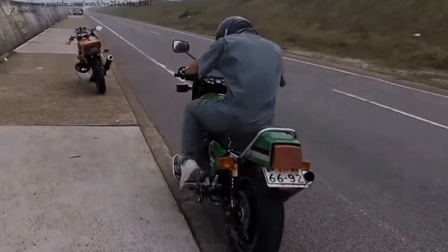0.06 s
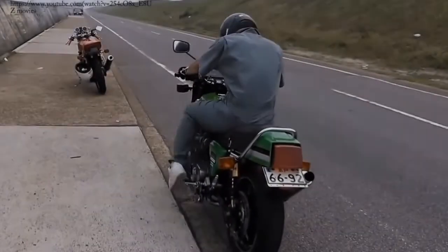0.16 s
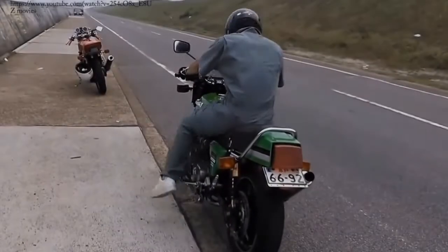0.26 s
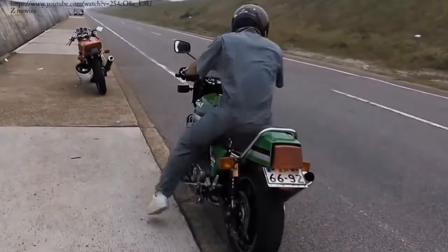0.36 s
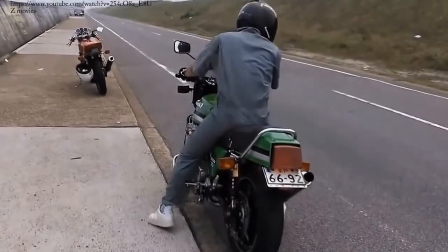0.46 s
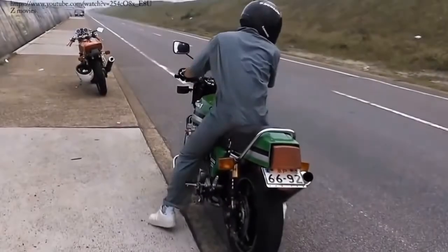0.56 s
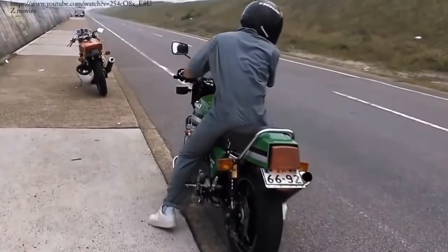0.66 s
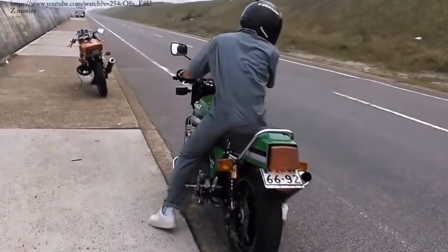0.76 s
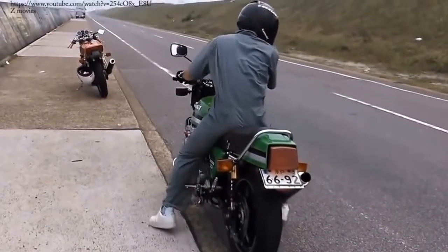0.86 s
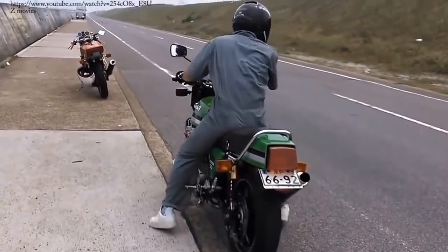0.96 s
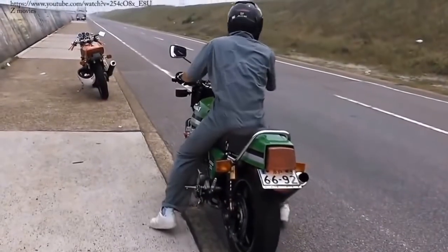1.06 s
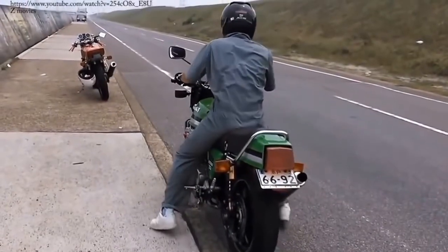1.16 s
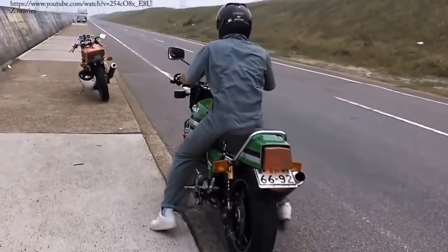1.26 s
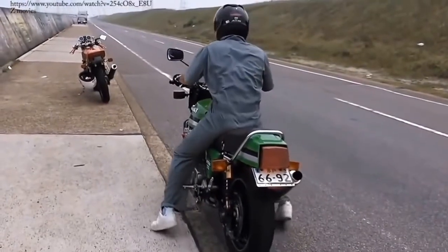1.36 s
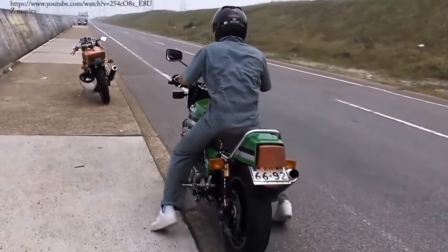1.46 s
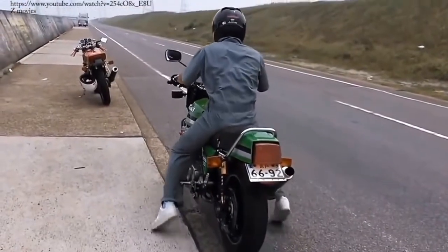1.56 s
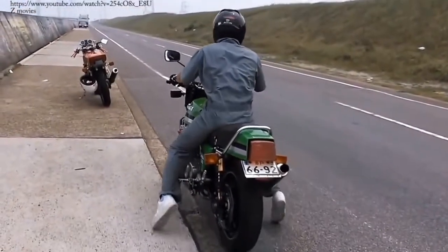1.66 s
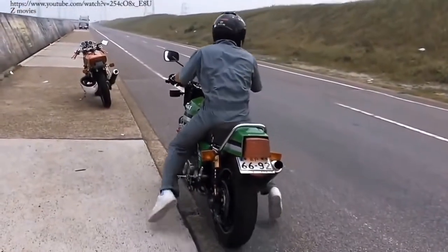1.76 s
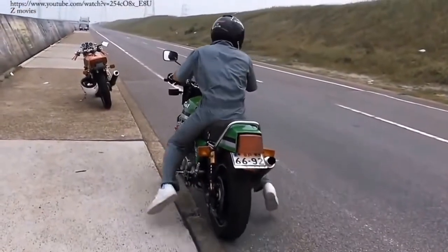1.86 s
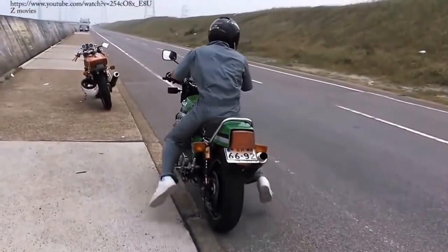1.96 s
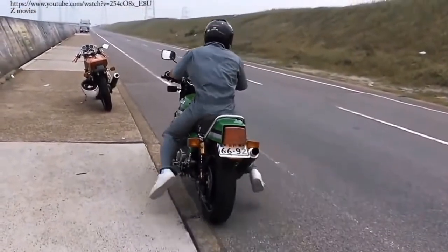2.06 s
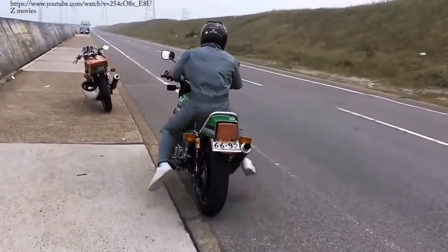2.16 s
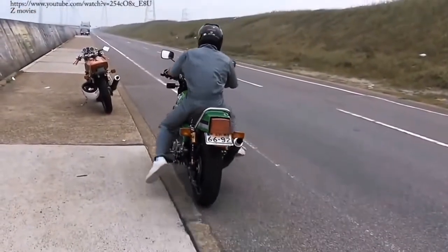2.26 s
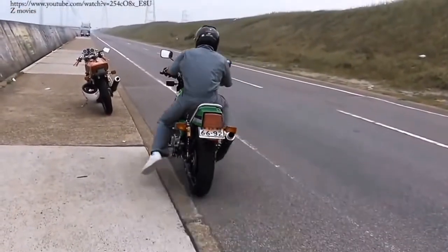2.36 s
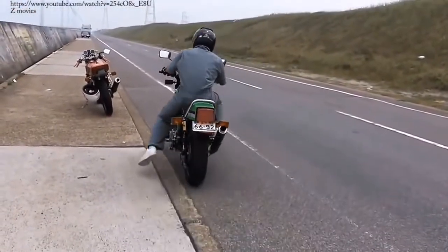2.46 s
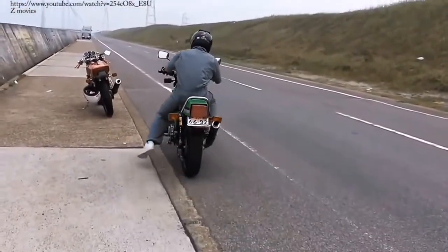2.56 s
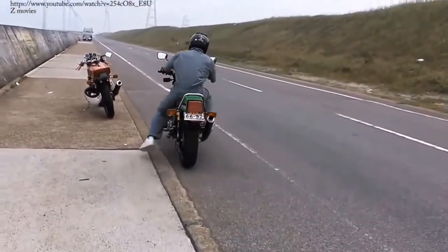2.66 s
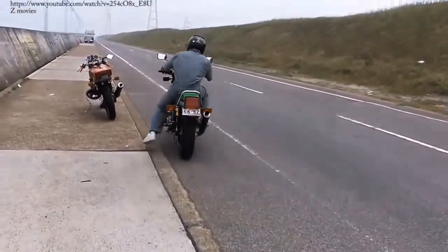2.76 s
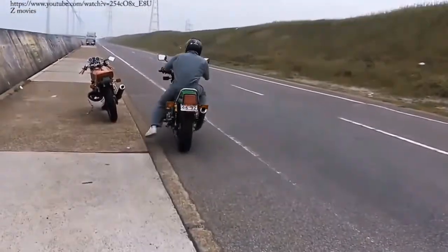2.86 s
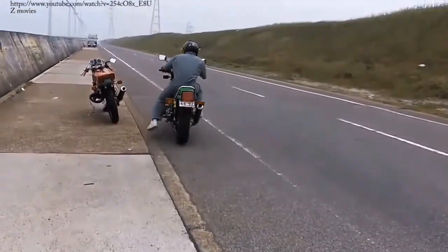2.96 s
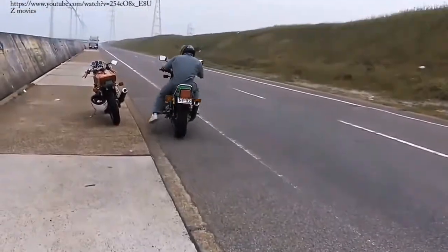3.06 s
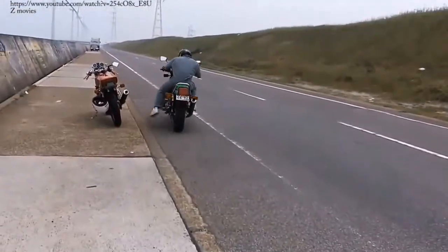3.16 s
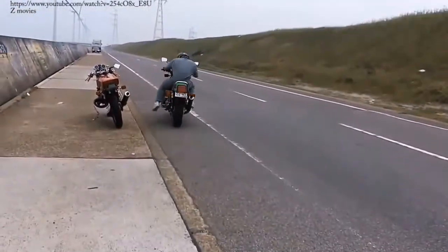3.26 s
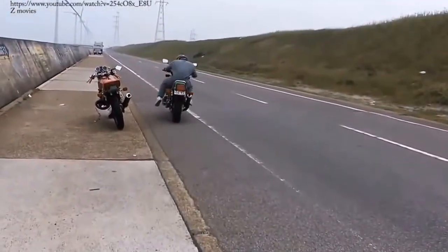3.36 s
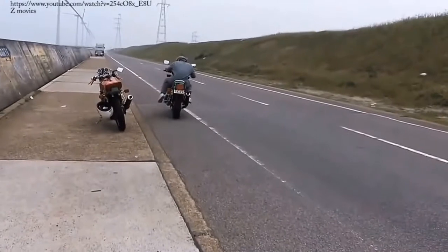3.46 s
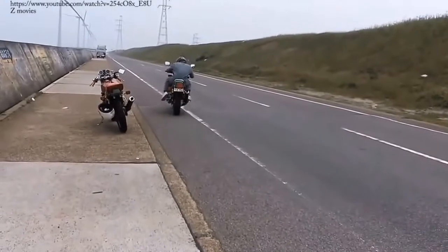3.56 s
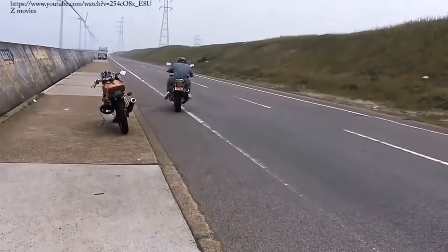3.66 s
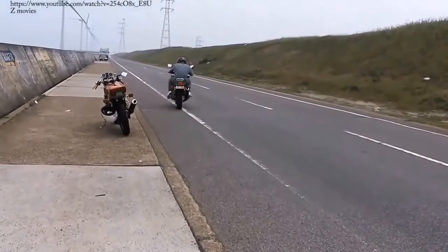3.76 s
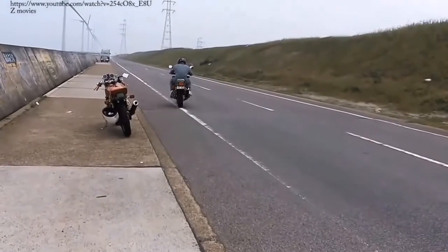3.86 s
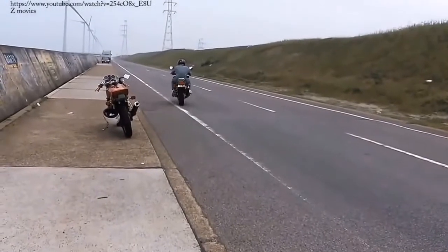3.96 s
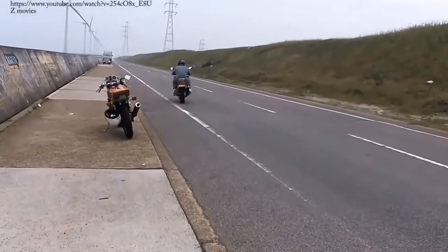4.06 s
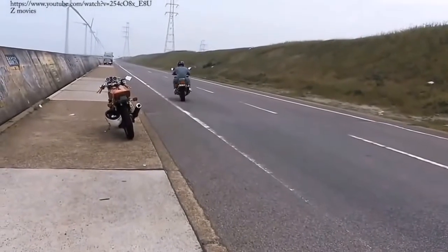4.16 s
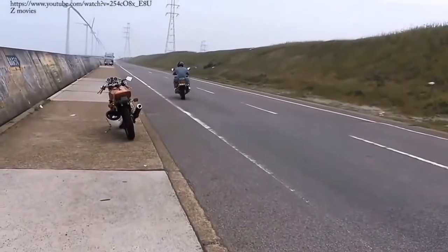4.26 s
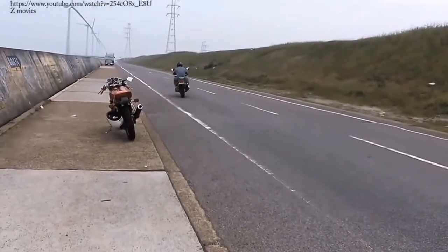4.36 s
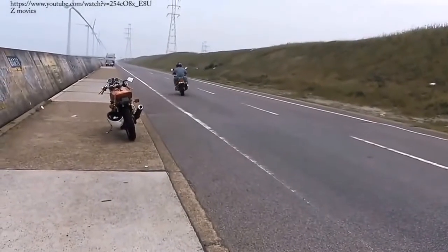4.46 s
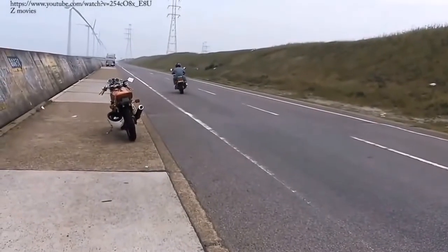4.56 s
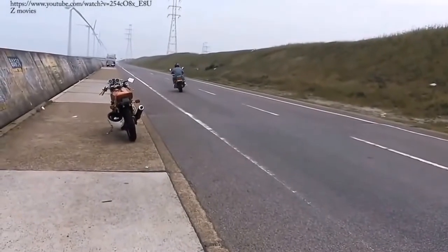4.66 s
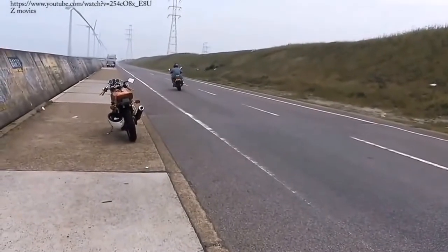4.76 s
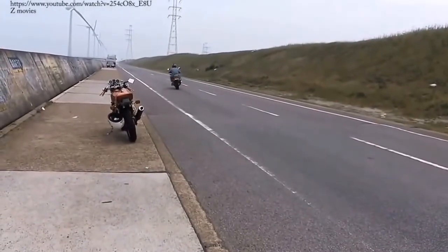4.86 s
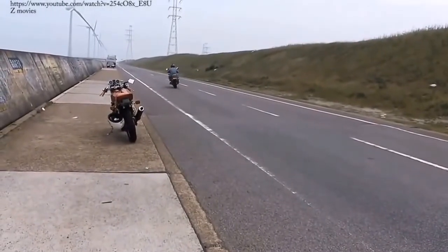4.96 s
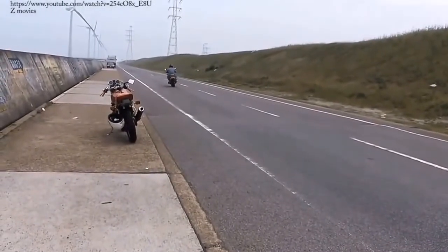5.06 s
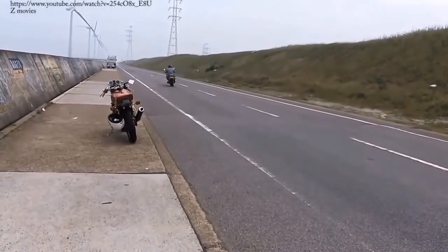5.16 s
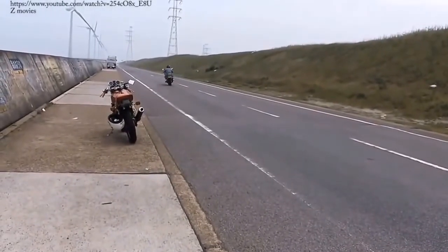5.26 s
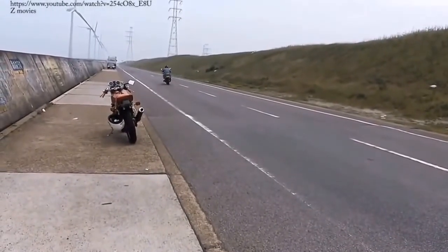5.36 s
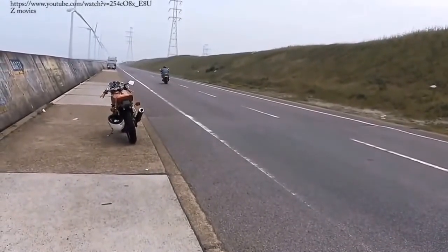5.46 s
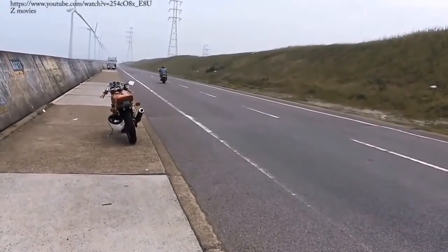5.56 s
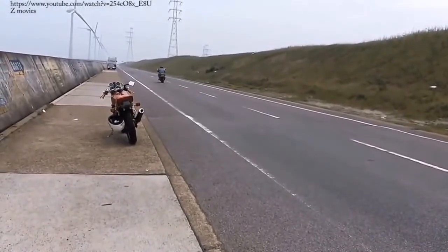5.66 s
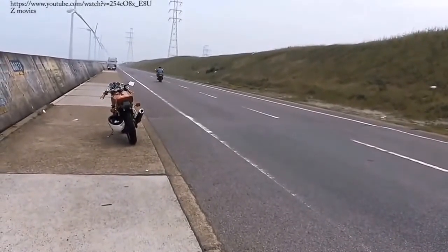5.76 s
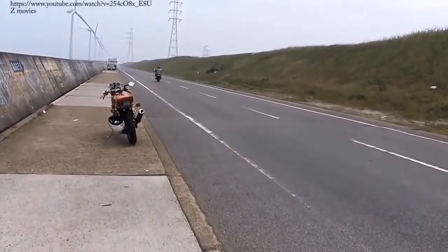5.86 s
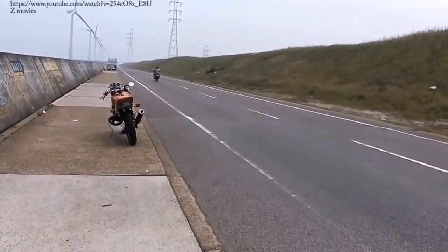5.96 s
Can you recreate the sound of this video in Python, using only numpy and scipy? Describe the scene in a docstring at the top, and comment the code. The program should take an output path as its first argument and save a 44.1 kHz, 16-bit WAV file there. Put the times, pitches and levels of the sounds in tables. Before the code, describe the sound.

Outdoors, a fixed microphone near the exhaust hears a motorcycle idling roughly, each firing a soft thump with a puff of gas. It revs to a low drone, then accelerates away with rough pulsing growl and hiss that changes colour with distance. A short dip and driveline knock precede a jerky surge and a long rising, cleaner roar. One fast gear change drops the pitch with a bark and falter before it pulls again.

```python
"""A motorcycle idles unevenly at the roadside, clunks into gear, revs up, pulls away and shifts up once.
At idle each firing rings the exhaust pipe with a thump and spits a puff of gas hiss. Under power the thumps
fuse into a tone, made of sines on multiples of the firing rate, with noise pulsing at each firing.
The hiss changes colour as the machine recedes and turns its pipe to the listener. Driveline clunks mark
gears taking up load, and faint steady roadside noise lies under it all."""
import sys
import numpy as np
from scipy import signal
from scipy.fft import rfft, irfft, next_fast_len
from scipy.io import wavfile
from scipy.ndimage import uniform_filter1d

SR = 44100
rng = np.random.default_rng(int(sys.argv[2]) if len(sys.argv) > 2 else 0)


def persist_wave(psi):
    """Save psi, clipped to +-1, as 16-bit WAV."""
    counts = np.round(np.clip(psi, -1, 1) * 32767).astype(np.int16)
    wavfile.write(sys.argv[1], SR, np.atleast_2d(counts).T)


N = 265041  # length in samples

# The lowest parts of the engine tone. Each row: multiple of the firing rate, base level in dB with the clutch
# slipping, with the clutch home and when pulling hard, random waver in dB, share of the upper orders' swell.
LOW_ORDERS = [(.5, -38, -35, -44.5, 4.5, 0), (1, -17, -19.5, -17, 1.6, 0),
              (1.5, -30.5, -42.5, -38.5, 4.5, .3), (2, -26.5, -17.5, -20.5, 1.5, .1),
              (2.5, -40.5, -41, -31.5, 2.5, .6), (3, -25.5, -29, -26, 1.5, .4),
              (3.5, -49, -31, -28.5, 2.5, .8), (4, -26.5, -41, -27.5, 3, .8),
              (5, -21.5, -40, -28.5, 2.5, .8)]
# How the pipe passes the upper orders and the growl. Each row: frequency in Hz, relative level in dB.
UPPER_PIPE = [(150, 8), (330, -7.5), (480, -15), (570, -5.5), (720, -6), (900, -12), (1080, -14.5),
              (1500, -14.5), (1800, -23.5), (2200, -24.5), (3000, -28.5), (4500, -28)]
# How far the machine has gone. Each row: time in seconds, stage (0 close, 1 leaving, 2 far).
DISTANCE_STAGE = [(0, 0.073), (2.1, 0.091), (2.5, 0.72), (3.3, 1.4), (3.75, 1.52), (3.9, 2.01),
                  (6.01, 2.215)]


def from_db(db):
    """Turn dB into a gain."""
    return 10 ** (np.asarray(db) / 20)


def rms_one(x):
    """Scale a sound to an rms (average strength) of 1."""
    return x / np.sqrt(np.mean(x ** 2) + 1e-20)


def in_time(rows):
    """Draw straight lines between the rows of a time table: one curve a column, one value a sample."""
    seconds, *columns = np.transpose(rows)
    return [np.interp(np.arange(N) / SR, seconds, column) for column in columns]


def at_hz(points, hz):
    """Read a spectrum table at any frequency, on a logarithmic frequency axis."""
    table_hz, table_db = np.array(points).T
    return np.interp(np.log(hz), np.log(table_hz), table_db)


def ramp(start_s, length_s):
    """Rise from 0 at the start to 1 after the given length."""
    return np.clip((np.arange(N) / SR - start_s) / length_s, 0, 1)


def drift(rate_hz):
    """Slow random wandering with rms 1: noise smoothed by two equal lowpasses, made at 1/40 of the sample rate."""
    r = np.exp(-80 * np.pi * rate_hz / SR)
    noise = rng.standard_normal(N // 40 + 2002)
    slow = signal.lfilter([1], [1, -2 * r, r * r], noise)[2000:]  # skip the filter's start
    return np.interp(np.arange(N) / 40, np.arange(len(slow)), rms_one(slow))


def coloured(spectrum):
    """Noise with the given spectrum in dB, rms 1."""
    size = next_fast_len(N)
    hz = np.maximum(np.arange(size // 2 + 1) * SR / size, 1)
    white = rfft(rng.standard_normal(size))
    return rms_one(irfft(white * from_db(at_hz(spectrum, hz)), size)[:N])


def ring(clicks, hz, t60):
    """A resonator: each unit click starts a sine of height 1 that fades by 60 dB in t60 seconds."""
    r, w = from_db(-60 / (t60 * SR)), 2 * np.pi * hz / SR
    return signal.lfilter([0, np.sin(w)], [1, -2 * r * np.cos(w), r * r], clicks + 1e-18)


def burst(clicks, rise_s, fall_s):
    """Envelope of a puff: two smoothing filters give each click a rise and an exponential fall."""
    rise, fall = np.exp(-1 / (rise_s * SR)), np.exp(-1 / (fall_s * SR))
    falling = signal.lfilter([1], [1, -fall], clicks + 1e-18)
    return signal.lfilter([1 - rise], [1, -rise], falling)


def idle():
    """Separate firings: each pressure wave rings the pipe, then a jet of gas spits (envelope only)."""
    # Single firings. Each row: time in seconds, relative spit level in dB, relative thump level in dB.
    firings = [(0.0222, -28, -31), (0.0408, -27, -22), (0.066, -27, -30), (0.121, -18, -27),
               (0.139, -6.5, -21), (0.172, -5, -18), (0.202, 0.5, -31), (0.2498, -9, -18.5),
               (0.2784, -14, -26), (0.306, -10.5, -21), (0.3337, -7, -17.5), (0.3592, -5, -19.5),
               (0.372, -9, -38), (0.4169, -19, -24), (0.4402, -11.5, -22), (0.4656, -12, -20),
               (0.492, -6.5, -22), (0.517, -6, -20), (0.5413, -22, -22), (0.5674, -10.5, -20),
               (0.5907, -14, -17), (0.616, -4.5, -18), (0.6416, -5.5, -16), (0.6647, -11.5, -19.5),
               (0.7198, -25, -44), (0.734, -16, -50), (0.7479, -16, -23), (0.7757, -7.5, -22),
               (0.8065, -5.5, -18), (0.8343, -12.5, -18), (0.8622, -32, -28), (0.887, -8, -20),
               (0.9142, -9, -22), (0.9412, -9, -18), (0.9666, -2.5, -21), (0.9943, -7, -18),
               (1.05, -12, -22), (1.08, -12.5, -22), (1.1099, -5.5, -18.5), (1.1364, -9.5, -21),
               (1.1637, -5.5, -16), (1.189, -10, -20), (1.2147, -12, -20), (1.239, -5.5, -17),
               (1.262, -2.5, -13), (1.285, -5, -11), (1.304, -5, -16), (1.3216, -21, -18), (1.341, -4, -5)]
    # Tones of the pipe. Each row: frequency in Hz, relative level in dB, time to fade by 60 dB in seconds.
    pipe_modes = [(76.2, -11.5, 0.3), (116.7, -2, 0.21), (152, -42, .08), (227.6, -23, 0.24),
                  (326, -38, .06), (390, -48, 0.14)]
    seconds, spit_db, thump_db = np.transpose(firings)
    at = np.round(seconds * SR).astype(int)
    thumps = np.zeros(N)
    thumps[np.maximum(at - round(.003 * SR), 0)] = -from_db(thump_db)  # the pressure wave leads the jet
    thump = sum(from_db(level_db) * ring(thumps, hz, t60) for hz, level_db, t60 in pipe_modes)
    spits = np.zeros((3, N))  # one row each for roar, rasp and sizzle
    # separate chance in each layer gives every spit its own colour
    spits[:, at] = from_db(spit_db + 3.1 * rng.standard_normal((len(at), 3)).T)
    short_puff = burst(spits, 0.0023, 0.0021)
    long_tail = from_db(-19.5) * burst(spits, 0.0035, 0.014)
    return thump, short_puff + long_tail


def orders(turn, rate_hz, level_db, other_db, roar_db, waver_db):
    """Engine tone: sines on half multiples of the firing rate; the lowest ones follow their own levels."""
    half_order_db = -6.5  # unequal cylinders give lines between the firing orders
    bright_corner_hz, bright_roar_db, bright_share_per_octave = 1280, -23.5, 0.92
    out = np.zeros(N)
    own = dict(zip(np.array(LOW_ORDERS)[:, 0], level_db))
    for k in np.arange(1, 33) / 2:
        if k in own:
            db = own[k]
            lag = 0.26 * (k - 1) + 0.4 * (k - 1) ** 2  # radians
        else:
            db = other_db + at_hz(UPPER_PIPE, k * rate_hz) + half_order_db * (k % 1 > 0)
            lag = 0.58 * (k - 1) + rng.normal(0, 1.0)
        # above the corner, orders brighten and dull with the roar
        octaves = np.log2(np.maximum(k * rate_hz / bright_corner_hz, 1))
        db = db + bright_share_per_octave * (roar_db - bright_roar_db) * octaves
        rough_db = waver_db * k ** .35 * drift(14)  # upper orders are less steady
        phase = 2 * np.pi * k * turn - lag + 0.17 * np.sqrt(k) * drift(12.0)
        out -= np.sqrt(2) * from_db(db + rough_db) * np.cos(phase)
    return out


def snatch():
    """The driveline snatches: the firing rate swings, in Hz, in a dying oscillation."""
    start_s, swing_hz, period_s, decay_s = 4.072, 28.82, 0.1446, .14
    after = np.maximum(np.arange(N) / SR - start_s, 0)
    return swing_hz * np.exp(-after / decay_s) * np.sin(2 * np.pi * after / period_s)


def low_levels(rate_hz, shut, other_db):
    """Levels in dB of the lowest orders, from engine load, pipe response and throttle."""
    # Pipe response with its hollows. Each row: frequency in Hz, relative level in dB.
    low_pipe = [(25, -8), (50, -9.5), (88, -2), (145, 1), (210, 2.5), (241, -2), (285, 1), (340, -2.5),
                (390, -12.5), (430, -8.5), (478, -18), (510, -14.5), (540, .5), (585, 0.5), (640, -11.5),
                (680, 2), (710, 0.9), (860, -3), (960, -3), (1080, -13), (1400, -6.5)]
    shut_low_db = -8  # drop while the throttle is shut
    swell_from_db = -19  # upper-order level at which the swell adds nothing
    home = ramp(2.49, 0.039)  # the clutch bites
    pull = ramp(3.53, 0.571)  # the engine comes to pull hard
    levels = []
    for k, slip_db, home_db, pull_db, waver_db, share in LOW_ORDERS:
        load_db = slip_db + home * (home_db - slip_db) + pull * (pull_db - home_db)
        swell_db = share * (other_db - swell_from_db)
        levels.append(load_db + at_hz(low_pipe, k * rate_hz) + shut_low_db * shut
                      + waver_db * drift(6) + swell_db)
    return levels


def gas_levels(swing_hz, shut):
    """Levels in dB of upper orders, roar, rasp and sizzle: slow curve, snatch, upshift and surges."""
    # Slow exhaust curve. Each row: time in seconds, base level in dB of upper orders, roar, rasp and sizzle.
    slow_levels = [(1.3, -32, -28, -44, -44), (1.35, -39, -31, -20, -33), (1.54, -30, -22.5, -12.5, -25),
                   (1.95, -31, -22, -19.5, -38), (2.19, -27.5, -22.5, -18.5, -30),
                   (2.5, -21.5, -17, -18, -40), (2.74, -22, -18.5, -19.5, -42),
                   (2.81, -27, -21.5, -20, -43), (3.3, -26, -21.5, -21.5, -43),
                   (4.04, -29, -23.5, -14.5, -43), (4.6, -17, -24.5, -16, -48),
                   (4.7, -18.5, -18, -13.5, -42), (4.82, -15, -21.5, -11.5, -23),
                   (4.95, -10.5, -23, -13.5, -27), (5.1, -12, -27.5, -17.5, -34),
                   (5.27, -14, -33.5, -18, -42), (5.5, -20, -35.5, -20.5, -34),
                   (5.75, -19.5, -27.5, -19, -34), (6.01, -16, -23, -11.5, -24)]
    # Change with the throttle shut: dB for upper orders, roar, rasp and sizzle.
    shut_db = [-9, -2, -10.5, -22]
    # After the shift the gas barks and falters. Each row: centre in seconds, half width in seconds,
    # change in dB before the layer's share.
    surges = [(5.435, 0.0098, -3.5), (5.46, 0.018, 3), (5.58, 0.061, -6), (5.72, 0.014, -2)]
    # How much each layer follows the surges: share for upper orders, roar, rasp and sizzle.
    surge_share = [0.66, 1, 1.1, 3.5]
    snatch_db_per_hz = 0.1
    t = np.arange(N) / SR
    surge_db = sum(db * np.exp(-((t - centre_s) / width_s) ** 2) for centre_s, width_s, db in surges)
    return [slow_db + snatch_db_per_hz * swing_hz + cut_db * shut + share * surge_db
            for slow_db, cut_db, share in zip(in_time(slow_levels), shut_db, surge_share)]


def jets(turn, spread_db, steady, sharp):
    """Gas flow under power: one burst a firing, each of its own size, shaped by its place in the cycle."""
    cycle = turn + 0.43
    size_by_firing = from_db(spread_db * np.clip(rng.standard_normal(N), -2, 2))
    part = cycle % 1
    pulse = (part / 0.32 * np.exp(1 - part / 0.24)) ** sharp
    gate = size_by_firing[cycle.astype(int)] * (steady + pulse)
    return rms_one(uniform_filter1d(gate, size=20))  # soften the edges


def gas_hiss(spit, noise_db, flows):
    """Gas noise in three colours, opened by the idle spits and then by the flow under power."""
    # Colours of the gas noise. Each row: frequency in Hz, relative level in dB per Hz.
    roar = [(60, -23), (300, -6), (500, -57), (800, -14), (1600, -1), (3300, 3), (5200, -3.5),
            (6000, -12.5)]
    rasp = [(5000, -37), (6000, -6.5), (7000, 0.5), (8000, 8), (9000, -6), (10500, -11.5), (11500, -39)]
    sizzle = [(9500, -25), (11000, 2), (13000, -0.5), (15200, 8.5), (16000, 3)]
    # Mix within an idle spit: relative level in dB of roar, rasp and sizzle.
    idle_mix_db = [-14.5, -6.5, -17.5]
    out = np.zeros(N)
    for colour, idle_db, puff, gas_db, flow in zip((roar, rasp, sizzle), idle_mix_db, spit, noise_db, flows):
        wavering_gain = from_db(gas_db + 1.69 * drift(3.95))
        envelope = from_db(idle_db) * puff + wavering_gain * flow
        out += coloured(colour) * envelope
    return out


def growl(other_db, clean, flow):
    """The part of the upper orders not heard as clean lines: pulsing noise coloured by the pipe."""
    spectrum = [(120, -11)] + UPPER_PIPE[1:] + [(6000, -55)]
    return from_db(other_db - 4.0) * np.sqrt(1 - clean ** 2) * flow * coloured(spectrum)


def resonate(x):
    """Resonances and hollows colour the gas noise and crossfade from stage to stage."""
    # Close, leaving and far. Each row: centre frequency in Hz, width in Hz, lift or cut in dB.
    close = [(707, 15, 19), (1145, 26, 7), (1575, 42, 8), (2030, 15, -35), (2670, 27, 3), (3054, 87, -13),
             (3370, 120, -3.5), (4400, 410, -6.5), (5560, 220, 8), (7000, 170, 0.5), (8750, 250, 1)]
    leaving = [(530, 147, -20), (710, 52, 7), (883, 42, 8), (963, 26, 4), (1450, 100, 2), (2040, 31, -10),
               (2650, 31, -13), (3040, 280, 13.5), (3360, 810, -17.5), (5220, 700, 4.5), (6650, 150, 4.5),
               (8080, 710, 3)]
    far = [(1080, 41, -2), (1573, 54, 8), (2790, 860, -7), (3850, 53, -23), (4180, 18, 7), (5315, 22, 8.5),
           (6950, 176, 5), (8180, 650, -12), (9010, 580, 7.5)]
    size = next_fast_len(N)
    hz = np.arange(size // 2 + 1) * SR / size
    spectrum = rfft(x, size)
    (stage,) = in_time(DISTANCE_STAGE)
    out = np.zeros(N)
    for k, peaks in enumerate((close, leaving, far)):
        lift_db = sum(db * np.exp(-((hz - centre) / width) ** 2) for centre, width, db in peaks)
        weight = np.clip(1 - abs(stage - k), 0, 1)
        out += weight * irfft(spectrum * from_db(lift_db), size)[:N]
    return out


def echoes(x):
    """Near surfaces return delayed copies whose lags wander as the machine moves."""
    # Road, kerb and wall. Each row: average lag in milliseconds, share before weakening with distance.
    surfaces = [(0.9, 0.38), (1.504, -0.25), (2.297, 0.25)]
    at = np.arange(N)
    near = 1 - .3 * in_time(DISTANCE_STAGE)[0]  # the echoes weaken with distance
    returned = np.zeros(N)
    for lag_ms, share in surfaces:
        lag = lag_ms * SR / 1000 * (1 + .06 * drift(.5))  # samples
        returned += share * np.interp(at - lag, at, x)
    return x + near * returned


def clunks():
    """Short noise bursts as gears take up load."""
    # Driveline knocks. Each row: time in seconds, relative level in dB, decay in seconds.
    knocks = [(0.213, -20.5, 0.016), (3.515, -22, 0.0093), (4.66, -14, 0.019), (5.283, -30, 0.012),
              (5.436, -30, .012), (5.453, -20, 0.027)]
    # Colour of a knock. Each row: frequency in Hz, relative level in dB per Hz.
    knock_colour = [(60, 2), (200, -22), (900, -6), (1500, -1), (2200, -8), (4000, -6.5), (8000, -1.5),
                    (10000, -27)]
    envelope = np.zeros(N)
    for start_s, level_db, decay_s in knocks:
        click = np.zeros(N)
        click[round(start_s * SR)] = from_db(level_db)
        envelope += burst(click, .002, decay_s)
    return envelope * coloured(knock_colour)


def roadside():
    """Faint background: steady coloured noise."""
    # Colour of the roadside noise. Each row: frequency in Hz, relative level in dB per Hz.
    floor_colour = [(15, -46), (25, -37), (107, 26), (500, -1), (1320, -2), (1590, 3.5), (4820, -7),
                    (8050, 6), (11100, -15), (15800, -0.5)]
    return from_db(-36.5) * coloured(floor_colour)


def scene():
    """Idle, then the engine under power, over a faint roadside floor."""
    # Engine speed under power. Each row: time in seconds, firings per second before the snatch is added.
    engine_speed = [(1.3, 50.4), (1.39, 74), (1.44, 87.5), (1.6, 92), (2.07, 85.4), (2.27, 90.7),
                    (2.37, 95.6), (2.51, 108), (2.77, 140), (2.85, 149), (3.27, 135.3), (3.37, 128),
                    (3.45, 107.6), (3.52, 122.4), (3.67, 135.6), (4.05, 164), (4.38, 200.5), (4.64, 225),
                    (4.96, 255.8), (5.26, 286), (5.31, 260), (5.41, 256), (5.43, 206), (5.5, 218),
                    (5.56, 215.2), (5.9, 234.4), (6.01, 233)]
    # Clean lines against growl. Each row: time in seconds, share of the upper orders heard as clean lines.
    clean_share = [(1.3, .5), (2.3, .2), (3.5, .2), (4.1, .7), (4.6, .92), (5.27, .9), (5.3, .15),
                   (5.46, .2), (5.6, .88)]
    swing_hz = snatch()
    shut = ramp(5.281, .007) - ramp(5.421, .012)  # upshift: the throttle shuts and opens again
    rate_hz = in_time(engine_speed)[0] + swing_hz
    turn = np.cumsum(rate_hz) / SR  # firings so far
    other_db, *noise_db = gas_levels(swing_hz, shut)
    level_db = low_levels(rate_hz, shut, other_db)
    running = ramp(1.31, 0.051)  # the throttle opens
    thump, spit = idle()
    # steady flow between the bursts for roar, rasp, sizzle and growl
    *gas_flows, growl_flow = [running * jets(turn, spread_db=2.2, steady=steady, sharp=3)
                              for steady in (.45, .22, .3, .6)]
    gas = gas_hiss(spit, noise_db, gas_flows)
    (clean,) = in_time(clean_share)
    clean_db = other_db + 20 * np.log10(clean)
    tone = running * orders(turn, rate_hz, level_db, clean_db, noise_db[0], waver_db=.8)
    exhaust_noise = echoes(resonate(gas + growl(other_db, clean, growl_flow)))
    return (thump + tone + exhaust_noise + clunks() + roadside())[None]


def record(dry):
    """The deep bass is rolled off, peaks are rounded, the top is cut."""
    bass_cut = signal.butter(2, 40, "high", fs=SR, output="sos")
    top_cut = signal.cheby2(24, 90, 15950, fs=SR, output="sos")  # 90 dB down from 15950 Hz
    dry = signal.sosfilt(bass_cut, dry)
    rounded = .68 * np.tanh(dry / .68)
    return signal.sosfilt(top_cut, rounded)


dry = scene()
out = record(dry)
persist_wave(out)
```